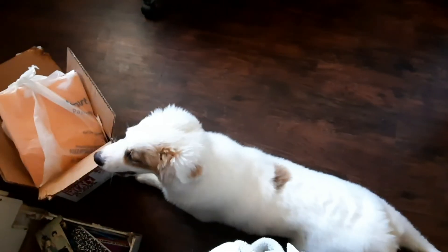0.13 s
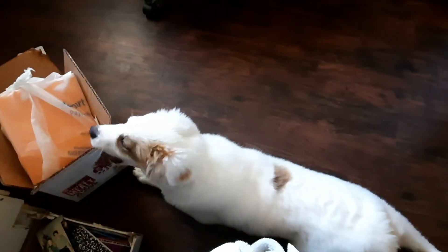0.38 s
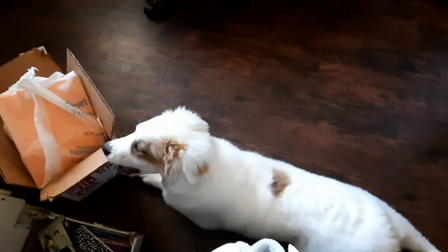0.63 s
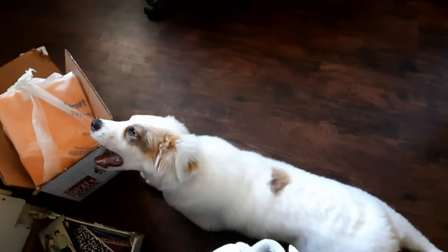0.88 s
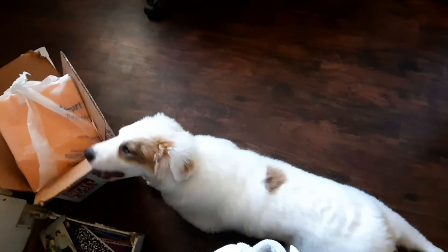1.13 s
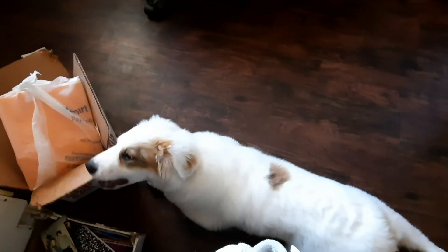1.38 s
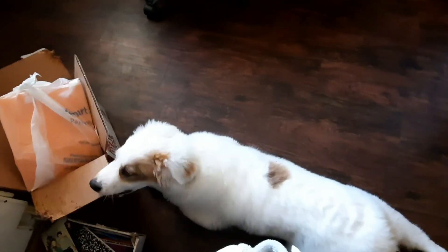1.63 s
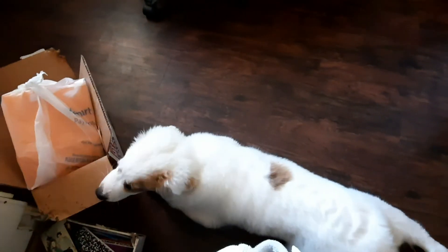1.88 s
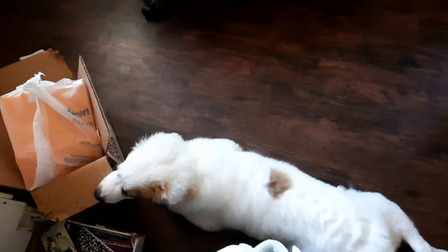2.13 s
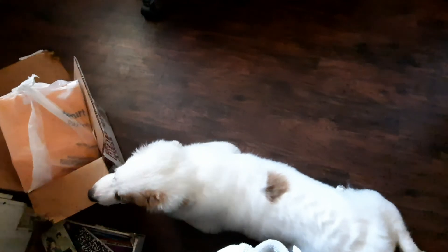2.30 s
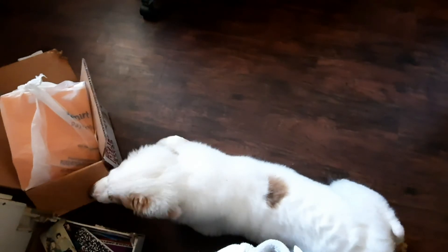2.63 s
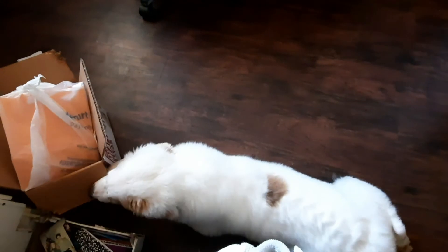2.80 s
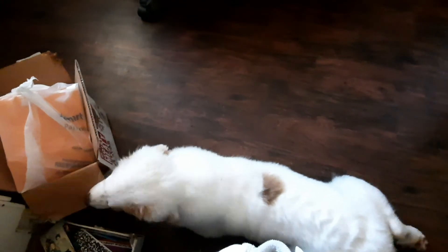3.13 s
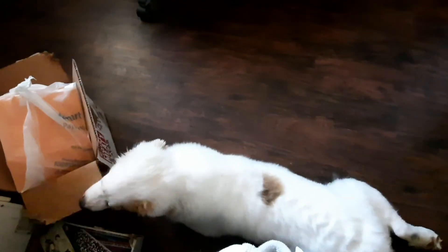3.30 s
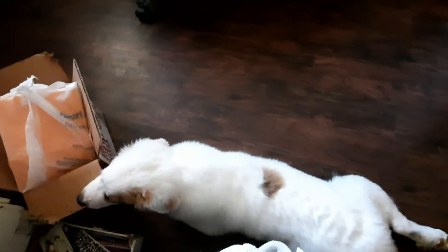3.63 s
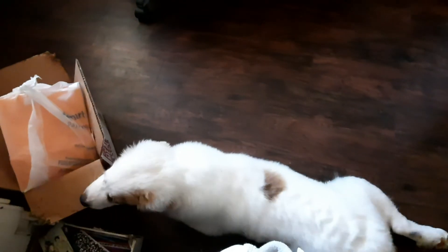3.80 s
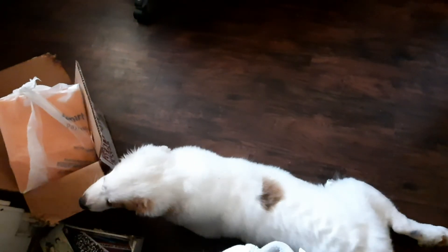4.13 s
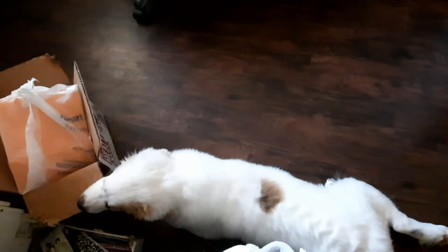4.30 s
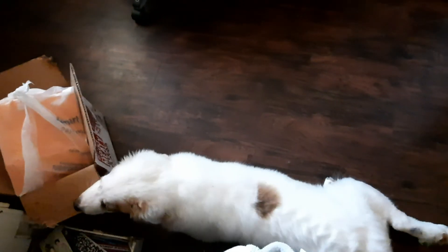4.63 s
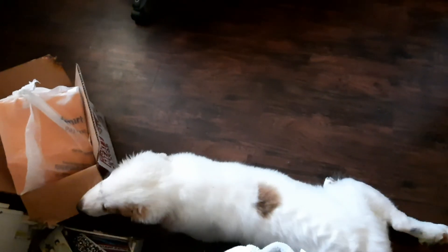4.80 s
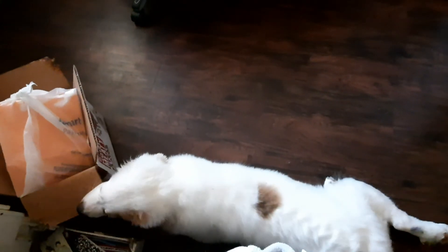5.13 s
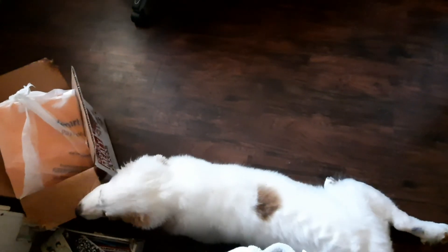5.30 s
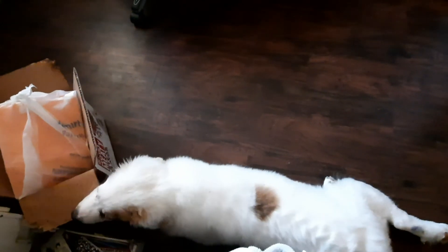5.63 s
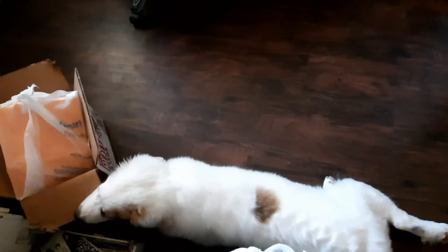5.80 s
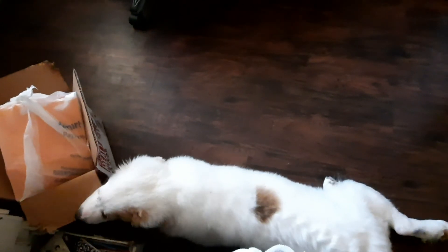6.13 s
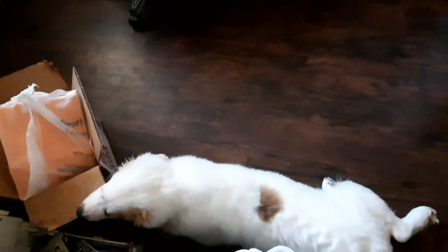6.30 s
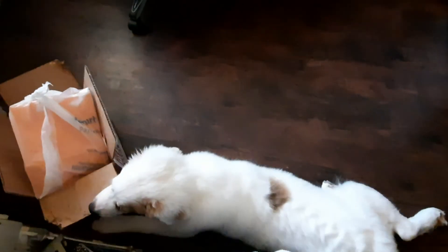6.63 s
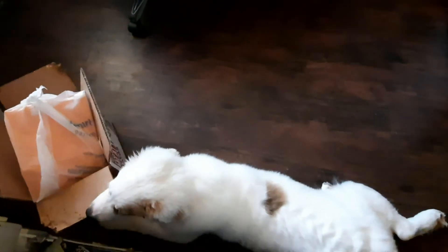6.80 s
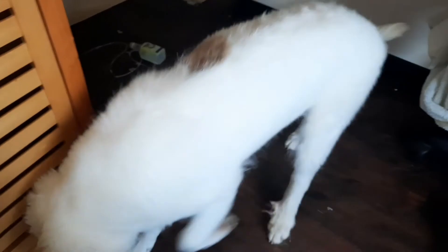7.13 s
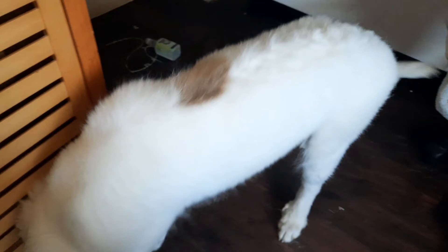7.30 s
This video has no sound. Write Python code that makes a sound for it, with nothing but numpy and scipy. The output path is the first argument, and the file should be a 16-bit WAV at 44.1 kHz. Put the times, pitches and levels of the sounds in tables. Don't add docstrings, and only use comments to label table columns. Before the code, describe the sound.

Close stereo sound in a small furnished room with quiet airy background and a short, dry reverberation. From 0 to 0.7 s a puppy mouths a cardboard flap: light rustle, tiny ticks, a hollow box thud near 0.45. Soft thuds and snaps follow at 1.05 and 1.45, with a brief scrape; a crisp snap at 2.0, then faint rubbing and sliding teeth to 2.7. A sharper snap comes at 2.9 and a low thud at 3.1. The loudest dry cracks strike at 3.8 and 4.0, with boxy knocks, then scraping and bumps around 4.4, another crack at 4.8, busy rustling to 5.1, smaller bites at 5.4 to 5.8, and strong cracks at 5.9 and 6.0. Rustles and nudges taper to 6.85. Sound cuts to silence, resuming about 7.0 much quieter and duller, with faint stirring, until a short paper tear bursts at 7.43, right at the end.

```python
import sys
import numpy as np
from scipy import signal
from scipy.fft import rfft, irfft
from scipy.io import wavfile
from scipy.ndimage import uniform_filter1d

SR = 44100
rng = np.random.default_rng(int(sys.argv[2]) if len(sys.argv) > 2 else 0)


def nominal_scale(level):
    x = np.asarray(level, float) / 20
    return 10 ** x


def master(y):
    cut = np.clip(np.atleast_2d(y).T, -1, 1)
    pcm = np.round(cut * 32767)
    wavfile.write(sys.argv[1], SR, pcm.astype(np.int16))


N = 329427

CUT_S, FADE_END_S, RESUME_S, OPEN_S = 6.872, 6.89, 6.985, 7.035
PANEL_TOP_HZ = 1500
AIR_SWAY_DB = 1.5


def at_hz(points, hz):
    table_hz, values = np.array(points).T
    return np.interp(np.log(np.maximum(hz, 1)), np.log(table_hz), values)


def colour(x, spectrum, size=4096):
    hz = np.arange(size // 2 + 1) * SR / size
    cepstrum = irfft(np.log(nominal_scale(at_hz(spectrum, hz))))
    cepstrum[1:size // 2] *= 2
    cepstrum[size // 2 + 1:] = 0
    h = irfft(np.exp(rfft(cepstrum)))[:size // 4]
    return signal.oaconvolve(np.atleast_2d(x), h[None] / np.linalg.norm(h), axes=1)[:, :N]


def cut(x, hz, kind):
    return signal.sosfilt(signal.butter(2, hz, kind, fs=SR, output="sos"), x)


def split(low, high, hz=4500):
    return cut(low, hz, "low") - cut(high, hz, "high")


def ring(x, hz, t60):
    r, w = nominal_scale(-60 / (t60 * SR)), 2 * np.pi * hz / SR
    return signal.lfilter([0, np.sin(w)], [1, -2 * r * np.cos(w), r * r], x + 1e-18)


def drift(rate):
    r = np.exp(-80 * np.pi * rate / SR)
    slow = signal.lfilter([1], [1, -2 * r, r * r], rng.standard_normal(N // 40 + 2002))[2000:]
    return np.interp(np.arange(N) / 40, np.arange(len(slow)), slow / slow.std())


def grains(per_s, spread_db):
    sizes = nominal_scale(spread_db * np.minimum(rng.exponential(1, N), 4)) * rng.choice([-1, 1], N)
    clicks = sizes * (rng.random(N) < per_s / SR)
    return clicks / clicks.std()


def strokes(slow, sudden):
    depth_db = 25.5
    t = np.arange(0, N + 64, 64) / SR
    first, second = 1e-7, 1e-7
    rows = [(*row, 1) for row in slow] + [(*row, 0.12) for row in sudden]
    for peak, width, db, share_db, rise in rows:
        away = np.where(t < peak, (peak - t) / rise, t - peak) / max(width, .01)
        same_scene = (t < CUT_S) == (peak < CUT_S)
        gain = nominal_scale(db - depth_db * away) * same_scene
        first = first + gain
        second = second + gain * nominal_scale(share_db)
    return [20 * np.log10(np.interp(np.arange(N) / 64, np.arange(len(t)), v)) for v in (first, second)]


def edit_db():
    t = np.arange(N) / SR
    until = [t < CUT_S, t < FADE_END_S, t < RESUME_S, t < OPEN_S]
    return np.select(until, [-4.5, -53, -92, -52], -28.5)


def house_air():
    # f/Hz, level/dB per Hz
    air_colour = [(18, -49), (30, -14), (199, -9), (295, -3), (616, -21.5), (1040, -13), (1390, -15),
                  (2230, -10), (4080, -20), (6720, -11.5), (8300, -19.5), (9220, -41.5), (10500, -21),
                  (14000, -17.5), (16000, -29)]
    level_db, patch_db = -65, 5 - 1
    patch_db = 4
    shared, own = rng.standard_normal(N), rng.standard_normal((2, N))
    air = colour(split(shared + 1.8 * own, own, 600), air_colour)
    air = nominal_scale(level_db + edit_db() + AIR_SWAY_DB * drift(5.9)) * air
    patch_db = 5
    return split(air, nominal_scale(patch_db * drift(8)) * air, 3000)


def handling():
    # peak t/s, width/s, level/dB, brightness/dB
    rubs = [(.26, 0.63, -67.5, 2.5), (.46, 0.082, -75, 4), (.55, 0.47, -104, 11), (.63, 0.16, -80.5, 16),
            (.79, 0.055, -59.5, -4), (1.3, 0.27, -64, -3.5), (1.42, 0.18, -71, 7), (1.61, 0.19, -83, 12),
            (1.88, 0.18, -84, 10), (2.005, .04, -59, 6), (2.4, 0.79, -67.5, -8), (2.64, 0.14, -53.5, -2),
            (3, 0.1, -54, 1), (3.08, 0.15, -57.5, -3), (3.5, 1, -64, 2.5), (3.96, 0.086, -47, 1),
            (4.1, 0.058, -59.5, -8), (4.39, 0.29, -65, -21), (4.72, 0.33, -71.5, 2.5),
            (4.87, 0.14, -44.5, -3), (4.95, 0.049, -70, 12), (5, 0.046, -42.5, -5.5),
            (5.45, 0.19, -70, 3.5), (5.59, 0.084, -51.5, -2.5), (5.63, 0.1, -58, -9.5),
            (5.765, 0.038, -57, 1), (5.97, 0.067, -54, 5), (6.13, 0.076, -65, -1.5), (6.385, 0.054, -52, 0),
            (6.52, 0.36, -59.5, 0.5), (6.66, 0.14, -52.5, 0)]
    # start t/s, width/s, level/dB, brightness/dB
    brushes = [(.03, 0.062, -77, 8), (.2, 0.36, -66, 6), (0.723, 0.094, -68, 13.5), (.94, 0.14, -105, 20),
               (1.12, 1, -72.5, 0.5), (2.06, 0.45, -77, -19), (2.899, 0.023, -45, -17),
               (3.19, 0.22, -62, -31), (3.459, 0.031, -72.5, 20), (4.31, 0.065, -86, -11),
               (5.325, 0.088, -84, -19), (5.72, 0.18, -69, 11), (6.245, 0.288, -53, -17),
               (6.799, 0.11, -93.5, -14), (1.84, 1, -73, 4), (3.101, 0.64, -87, -13), (5.2, 0.11, -69, 3),
               (4.5, 0.15, -76.5, -3)]
    # peak t/s, width/s, rumble level/dB, scrape share/dB
    drags = [(.02, 0.088, -56, -1.5), (.26, 0.14, -43.5, -6.5), (.44, 0.012, -32, -34),
             (.655, 0.12, -54.5, -1.5), (1.13, 0.38, -55.5, -10), (1.3, 0.25, -59, -2),
             (1.43, 0.02, -40, -22), (1.5, 0.06, -56, -6), (1.6, 0.061, -44.5, -11.5),
             (1.875, 0.15, -63.5, -4), (2.06, 0.099, -63, -6), (2.67, 0.069, -53, -15.5),
             (2.99, 0.043, -54, -19), (3.08, 0.029, -39, -25), (3.55, 1, -63, -8.5),
             (3.64, 0.24, -58.5, -8), (3.96, 0.13, -47, -0.5), (4.256, 0.019, -50.5, -3.5),
             (4.39, 0.27, -52, -17.5), (4.84, 0.18, -43.5, -2.5), (5.04, 0.018, -38, -6),
             (5.46, 0.06, -60, -28), (5.635, 0.061, -44, -6), (5.765, 0.029, -43.5, -16),
             (5.98, 0.096, -46, -0.5), (6.385, 0.23, -51, -6), (6.52, 0.046, -56, -21),
             (6.66, 0.18, -47, -8.5), (6.81, 0.043, -51, -12), (5.54, 0.17, -44.5, -8.5)]
    # peak t/s, width/s, level/dB, brightness/dB
    stirs = [
        (7.05, .3, -88, -1.5),
        (7.1, .1, -104, -18.5),
        (7.229, 0.039, -75, 1.5),
        (7.299, 0.52, -99, 8),
    ]
    stir_rumble_db, stir_scrape_db = 3, -18
    tear_s, tear_db, tear_fade_db_per_s = 7.432, -37.5, 250
    tear_shares_db = 0, -40, -23, -32

    dragged = [(s, width, db + stir_rumble_db, stir_scrape_db) for s, width, db, _ in stirs]
    levels = strokes(rubs, brushes + stirs) + strokes(drags, dragged)
    since = np.arange(N) / SR - tear_s
    tear = np.where(since > 0, tear_db - tear_fade_db_per_s * since, -200)
    return [np.maximum(db, tear + share) for db, share in zip(levels, tear_shares_db)]


def rustle(rustle_db, bright_db, scrape_db):
    # f/Hz, level/dB per Hz
    rustle_colour = [(350, -32), (600, -5), (1030, -1), (1410, -6), (2440, -8.5), (5050, -12.5), (6200, -8),
                     (7830, -7), (9760, -12), (13200, -6), (14900, -4.5), (16000, -4.5)]
    clumps_db = 4
    crackle = grains(2500 * nominal_scale(clumps_db * drift(27)), spread_db=3.0)
    fine = nominal_scale(-1.0) * crackle + nominal_scale(-17.0) * rng.standard_normal(N)
    fine = fine * nominal_scale(AIR_SWAY_DB * drift(47))
    upper = split(nominal_scale(rustle_db + 5.5) * fine, nominal_scale(bright_db + 4.5) * fine)
    flap = ring(nominal_scale(scrape_db - 29) * fine, 1050, .035) - ring(nominal_scale(scrape_db - 33) * fine, 700, .025)
    rubbing = colour(split(nominal_scale(scrape_db + 3.0) * fine, upper, PANEL_TOP_HZ), rustle_colour)[0]
    return rubbing + cut(flap, 450, "high")


def box(rumble_db):
    # f/Hz, level/dB, t60/s
    modes = [(75, -4, .1), (105, -4, .1), (142, -1, .1), (195, -3, .06), (250, -4, .05), (288, -1, .06),
             (325, -3, .05), (370, -4, .045), (445, -2, .055), (510, -3, .04)]
    # t/s, peak level/dB, main pitch f/Hz, deep level/dB
    thuds = [(0.432, -25.5, 270, -26.5), (0.468, -37.5, 320, -31), (1.04, -26, 456, -31),
             (1.065, -28.5, 440, -44), (1.081, -46, 450, -59), (1.45, -32, 262, -37),
             (1.476, -38.5, 247, -36), (2.014, -32.5, 270, -37), (2.036, -36.5, 192, -54),
             (2.908, -40.5, 261, -42), (3.075, -36, 248, -27), (3.108, -38.5, 190, -41),
             (3.624, -37.5, 362, -34), (4.238, -31.5, 275, -49), (4.622, -29, 373, -32.5),
             (5.445, -41, 260, -51), (5.459, -43, 195, -51.5), (6.521, -43.5, 279, -44.5),
             (6.797, -36.5, 272, -30.5), (6.816, -59, 233, -57)]
    # t/s, peak level/dB, main pitch f/Hz
    nudges = [(0.02, -47, 430), (0.201, -38.5, 490), (0.215, -41, 272), (0.268, -39, 263),
              (0.312, -47.5, 317), (0.634, -49, 258), (1.437, -39.5, 280), (1.588, -46, 286),
              (1.849, -58, 282), (2.676, -55, 288), (3.351, -54.5, 346), (3.458, -50.5, 410),
              (4.377, -34.5, 317), (4.445, -37, 357), (5.003, -41, 288), (5.2, -44, 244), (5.316, -54, 322),
              (5.755, -40.5, 357), (6.245, -48.5, 272), (6.33, -36.5, 310), (6.377, -38.5, 260),
              (6.613, -41, 286), (6.66, -49, 303), (7.148, -78, 279), (7.45, -43, 501)]
    # t/s, peak level/dB, main pitch f/Hz, deep level/dB
    knocks = [(3.799, -25, 400, -48), (3.879, -23.5, 284, -52), (4.004, -26, 347, -37.5),
              (4.791, -23.5, 400, -40.5), (5.056, -32.5, 287, -65), (5.066, -38, 288, -58),
              (5.435, -36, 262, -51), (5.617, -32, 345, -46), (5.643, -47.5, 306, -61),
              (5.899, -25.5, 308, -47.5), (6.019, -22.5, 390, -42)]
    nudge_deep_db, deep_hz = -20.5, 190
    soft_contact_s, knock_contact_s = .011, 0.0069
    wobble_db, wobble_s, lumps_db = -13.5, 0.025, 3

    blows = thuds + [(*row, row[1] + nudge_deep_db) for row in nudges] + knocks
    s, peak_db, main_hz, deep_db = np.transpose(blows)
    starts = (s * SR).astype(int)
    contact = np.where(np.arange(len(s)) < len(s) - len(knocks), soft_contact_s, knock_contact_s)
    luck = rng.normal(0, 3.3, (len(s), len(modes)))
    hits = np.bincount(starts, nominal_scale(peak_db + wobble_db), N)
    wobble = signal.lfilter([1], [1, -np.exp(-1 / (wobble_s * SR))], hits)
    shake = (nominal_scale(rumble_db) + wobble) * nominal_scale(lumps_db * drift(30) - 28.0) * rng.standard_normal(N)
    shake, out = np.pad(shake, (0, 2000)), np.zeros(N)
    for k, (hz, db, t60) in enumerate(modes):
        deep = hz < deep_hz
        force = nominal_scale(db - 7.9 * deep) * shake
        level_db = deep_db if deep else peak_db + 3.0 - 14 * np.abs(np.log2(hz / main_hz))
        strength = nominal_scale(level_db + db + luck[:, k])
        for i, g, push in zip(starts, strength, contact):
            t = np.arange(int((push + 2.0 / hz) * SR)) / SR
            force[i:i + len(t)] += 2 * g * np.sin(np.pi * t / t[-1]) * np.cos(2 * np.pi * hz * t) / len(t)
        out += (-1) ** k * ring(force[:N], hz, t60)
    return cut(cut(out, 91, "high"), 55, "high")


def slides():
    # peak t/s, width/s, level/dB, resonance f/Hz
    slips = [(.25, .12, -73, 1100), (.447, .04, -66, 1150), (.495, .04, -55.5, 2150),
             (1.45, .075, -44.5, 980), (1.459, .05, -56.5, 1900), (2.22, .06, -61, 3050),
             (2.4, .4, -71, 2300), (2.59, .07, -60, 1250), (2.66, .1, -59.5, 1050),
             (3.21, .13, -58.5, 2000), (4.4, .1, -53, 2300), (4.6, .1, -64.5, 1400),
             (5.36, .11, -73.5, 2300), (5.46, .12, -69, 2400), (5.55, .15, -65, 1100)]
    ring_cycles = 15
    grit = grains(2500, spread_db=-1.0)
    out = 0
    for peak, width, db, hz in slips:
        level_db = strokes([(peak, width, db, 0)], [])[0]
        out = out + ring(nominal_scale(level_db - 14) * grit, hz, ring_cycles / hz)
    return out


def breaking_fibres(crumble, count):
    after_db, after_s = -29, 0.014
    t = np.arange(2000) / SR
    shape = (count, len(t))
    runs = rng.standard_normal(shape) * (rng.random(shape) < .25)
    crumble = np.maximum(crumble, 3e-4)
    fade = np.exp(-t / crumble) + nominal_scale(after_db) * np.exp(-t / after_s) * (1 - t / t[-1])
    runs = runs * fade * np.minimum(t / (0.8 * crumble), 1)
    runs = runs * (1 + 0.24 * np.exp(-t / 0.0015))
    tones = rfft(runs)
    even = uniform_filter1d(np.abs(tones) ** 2, size=21, axis=1)
    return irfft(tones * (even.mean(axis=1, keepdims=True) / even) ** 0.28)


def snaps():
    # t/s, peak level/dB, panel share/dB, bright share/dB
    bites = [(0.2725, -45, -24, 3.5), (0.4381, -45, -2.5, 3), (0.4863, -48.5, -7.5, -3),
             (1.0349, -57.5, 4.5, 1.5), (1.061, -48.5, -5, -2.5), (1.4295, -68, 17, -23),
             (1.458, -58.5, 0.5, 1.5), (2.0108, -41, -4, 6.5), (2.0279, -33, -16.5, -4),
             (2.9106, -25.5, -22, -14.5), (3.7986, -12.5, -18, -10.5), (3.8658, -38, -1, -6.5),
             (3.879, -23.5, -6, -4.5), (3.9561, -41.5, -22.5, -1), (4.0015, -16, -10.5, -9.5),
             (4.2386, -48.5, -14, -5), (4.3824, -41, -22, -42), (4.4147, -43, -8.5, -8),
             (4.6235, -54, -6, -1.5), (4.7905, -20.5, -12, -12), (4.8814, -38.5, -24, -16),
             (4.9362, -38.5, -11.5, -1.5), (4.9894, -48, -4, -18), (5.0507, -33, -7, -0.5),
             (5.435, -44.5, -10.5, -11), (5.6203, -58, 5, 3), (5.7547, -45, -5, -1.5),
             (5.898, -28, -4.5, 0.5), (6.018, -14.5, -10.5, -8.5)]
    # t/s, peak level/dB, bright share/dB
    ticks = [(0.2114, -56, 4.5), (0.436, -53, 10), (0.449, -51, -4), (1.114, -52, -5), (1.2962, -63.5, 16),
             (1.304, -74.5, 10), (1.598, -62, 0), (1.849, -57, 0.5), (1.9155, -52.5, 3.5),
             (1.9304, -56, -0.5), (1.9907, -60, -6), (2.5863, -63, 7), (2.6128, -50, -0.5),
             (2.895, -52, -1), (3.075, -48, -2), (3.621, -65, 8.5), (3.6245, -50, -20.5),
             (3.6406, -49.5, 5), (3.769, -50, -0.5), (4.0112, -35.5, -12.5), (4.0702, -54.5, 10.5),
             (4.3058, -51, 0), (4.362, -48, 0), (4.586, -78, 11), (4.87, -43.5, -7.5), (5.1135, -53.5, 4.5),
             (5.326, -55, -19), (5.4097, -58.5, 4), (5.57, -60, 6), (6.0255, -37, -9.5), (6.2395, -53, 0),
             (6.331, -50.5, -7), (6.7996, -48.5, -5.5), (7.229, -81, -0.5)]
    # f/Hz, level/dB, t60/s
    panel_modes = [(510, -2, .03), (600, -3, .025), (725, -3, .025), (870, -3, .025), (985, -4, .025),
                   (1050, -2, .03), (1150, -4, .025), (1240, -3, .025), (1360, -4, .025)]
    # f/Hz, level/dB, t60/s
    first_grip = [(3050, -3, .016), (3600, -6, .012), (6050, -3, .01), (6900, -6, .01)]
    second_grip = [(1930, -6, .014), (2530, 0, .016), (2720, -2, .014), (3070, -5, .012), (6500, -11, .008)]
    # f/Hz, level/dB per Hz
    snap_colour = [(350, -26), (600, -24), (931, -10.5), (1030, -7.5), (2040, -5.5), (2610, -14.5),
                   (4280, -12.5), (6290, -11), (9490, -12), (11300, -9.5), (14500, -2.5), (16000, -4.5)]
    bite_crumble_s, tick_crumble_s, tick_panel_db = 0.0016, 0.001, -27
    crush_from_db, crush_slowing = -7.5, 0.75
    regrip_s, grip_db, grip_lag_s = 3.3, -9.5, 0.001824
    panel_luck_db, top_hz = 2, 9400

    rows = []
    for s, db, panel, bright in bites:
        slowing_db = crush_slowing * max(panel - crush_from_db, 0)
        rows.append((s, db, panel, bright, bite_crumble_s * nominal_scale(slowing_db)))
    rows += [(s, db, tick_panel_db, bright, tick_crumble_s) for s, db, bright in ticks]
    s, peak_db, panel_db, bright_db, crumble = np.transpose(rows)[:, :, None]
    panel_db, bright_db = peak_db + panel_db + 6.0, peak_db + bright_db
    at = (s * SR).astype(int) + np.arange(2000)
    runs = breaking_fibres(crumble, len(rows))

    def train(db):
        return np.bincount(at.ravel(), (nominal_scale(db) * runs).ravel(), N + 2000)[:N]

    luck = rng.normal(0, panel_luck_db, (len(rows), len(panel_modes)))
    panels = 0
    for k, (hz, db, t60) in enumerate(panel_modes):
        panels = panels + ring(train(panel_db + db + luck[:, [k]]), hz, t60)
    corner = 0
    for k, (hz, db, t60) in enumerate(first_grip + second_grip):
        other_grip = (s > regrip_s) == (k < len(first_grip))
        corner = corner + ring(train(peak_db + grip_db + db + luck[:, [k]] - 99.0 * other_grip), hz, t60)
    bright = split(train(bright_db + 26.5), train(bright_db + 17), top_hz)
    upper = split(train(peak_db + 21.5), bright)
    fibres = colour(split(train(panel_db + 0.5), upper, PANEL_TOP_HZ), snap_colour)[0]
    return fibres + np.roll(corner, int(grip_lag_s * SR)) + nominal_scale(-10.5) * cut(panels, 300, "high")


def room(x):
    # f/Hz, t60/s
    decay = [(100, 0.12), (400, 0.27), (1500, 0.17), (5000, 0.21), (13000, 0.17)]
    early_share, early_s = 1.2, 0.0038
    t, edges, echo = np.arange(SR // 2) / SR, 60 * 2 ** np.arange(9), 0
    for low, high in zip(edges, np.append(edges[1:], 19000)):
        band_pass = signal.butter(2, [low, high], "band", fs=SR, output="sos")
        band = signal.sosfilt(band_pass, rng.standard_normal((2, len(t))))
        echo = echo + band * nominal_scale(-60 * t / at_hz(decay, np.sqrt(low * high)))
    echo = echo * np.clip((t - .002) / 0.00032, 0, 1)
    echo = echo * (1 + early_share * np.exp(-t / early_s))
    return signal.oaconvolve(x[None], echo / np.linalg.norm(echo, axis=1, keepdims=True), axes=1)[:, :N]


def pair(x, pan_db, late_pan_db):
    left_lead, late_lead = 16, 8
    late = np.arange(N) > 6.93 * SR
    right = np.where(late, np.roll(x, late_lead), np.roll(x, left_lead)) + 0.15 * cut(x, 3200, "low")
    side = nominal_scale(np.where(late, late_pan_db, pan_db) / 2)
    return np.array([x * side, right / side])


def scene():
    air = house_air()
    rustle_db, bright_db, rumble_db, scrape_db = handling()
    crisp = rustle(rustle_db, bright_db, scrape_db) + slides() + snaps()
    hollow = box(rumble_db)
    direct = pair(crisp, pan_db=3.5, late_pan_db=-4.5) + pair(hollow, pan_db=1.8, late_pan_db=0)
    wet = room(nominal_scale(2.0) * (crisp + hollow))
    wet = split(.6 * wet.mean(axis=0) + 0.72 * wet, -wet, 340)
    return direct + wet * nominal_scale([[.6], [-.6]]) + air


def band_limit(x):
    return signal.sosfilt(signal.butter(12, 16620, fs=SR, output="sos"), x)


def record(dry):
    notch_hz, notch_width_hz, top_hz = 9290, 3300, 15750
    late = np.arange(N) > RESUME_S * SR
    notched = signal.lfilter(*signal.iirnotch(notch_hz, notch_hz / notch_width_hz, SR), dry) + 0.23 * dry
    hand_rumble = cut(cut(rng.standard_normal(N), 90, "low"), 12, "high")
    dull = split(dry, nominal_scale(-4) * dry, 8000) + nominal_scale(-71) * hand_rumble
    x = np.where(late, dull, nominal_scale(edit_db()) * notched)
    mix = signal.sosfilt(signal.cheby2(20, 40, top_hz, fs=SR, output="sos"), x)
    return band_limit(mix)


dry = scene()
out = record(dry)
master(out)
```